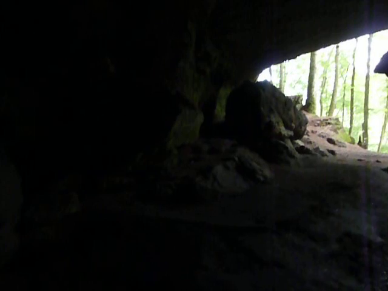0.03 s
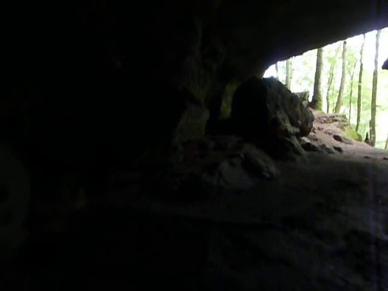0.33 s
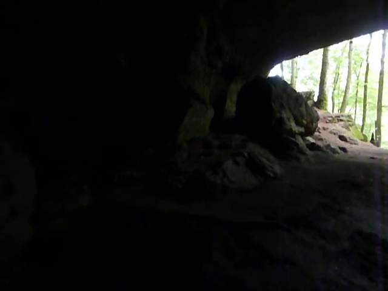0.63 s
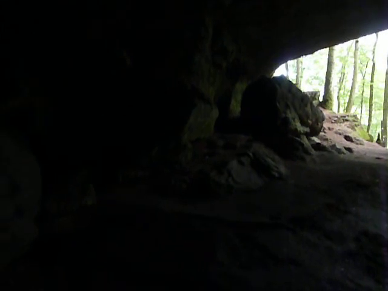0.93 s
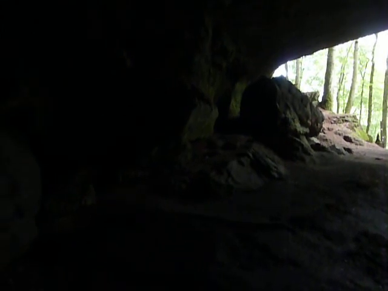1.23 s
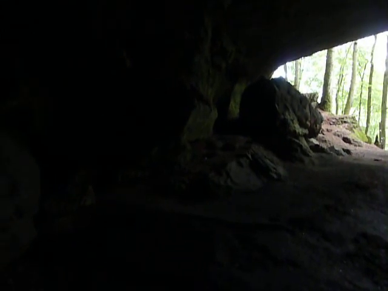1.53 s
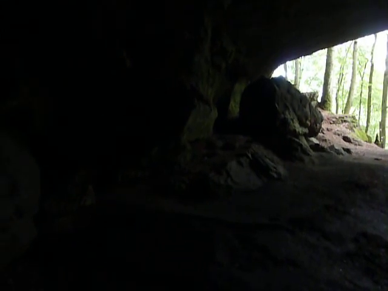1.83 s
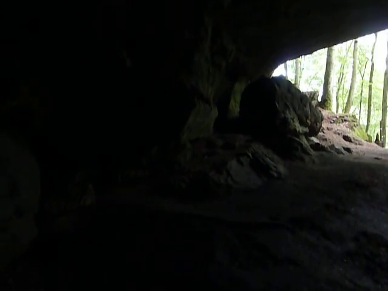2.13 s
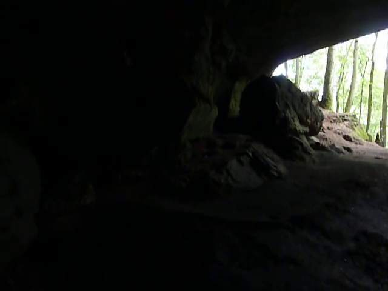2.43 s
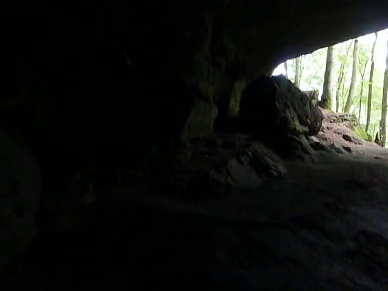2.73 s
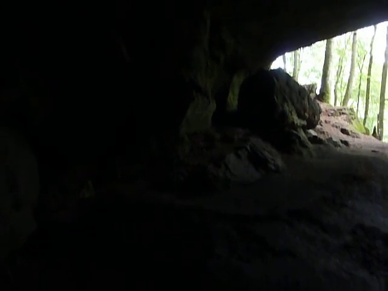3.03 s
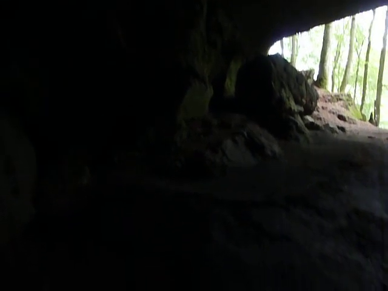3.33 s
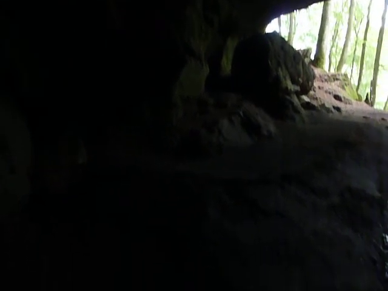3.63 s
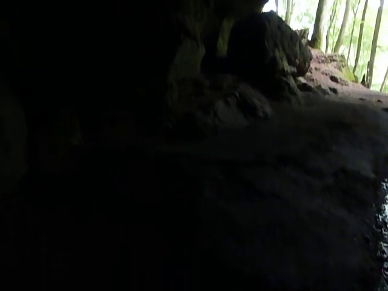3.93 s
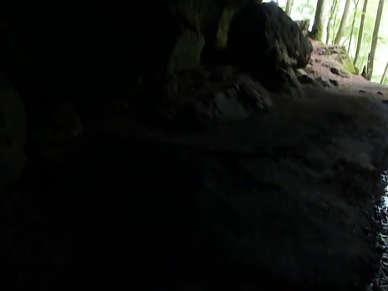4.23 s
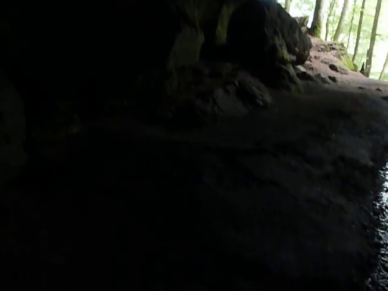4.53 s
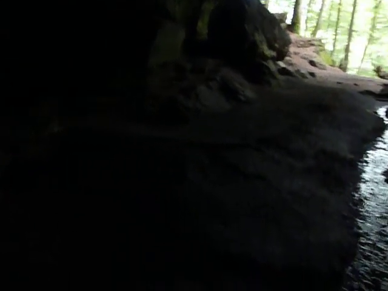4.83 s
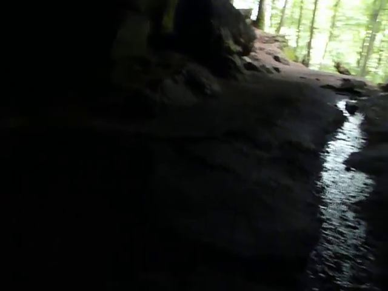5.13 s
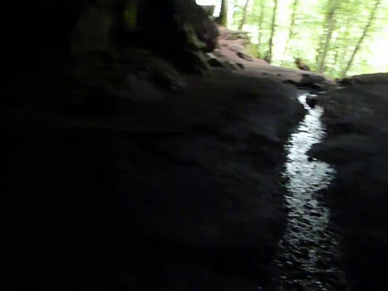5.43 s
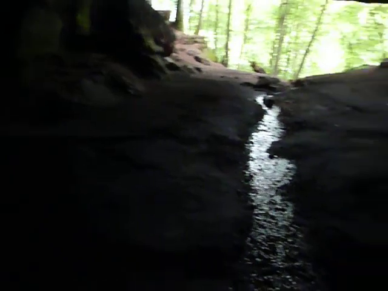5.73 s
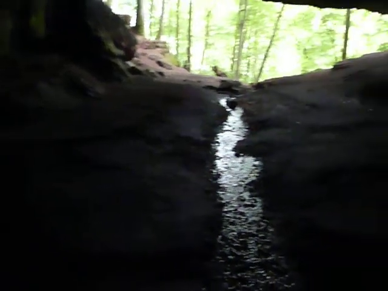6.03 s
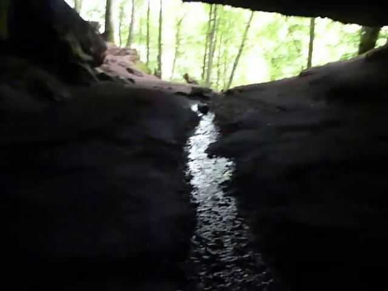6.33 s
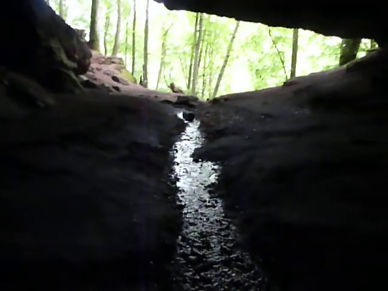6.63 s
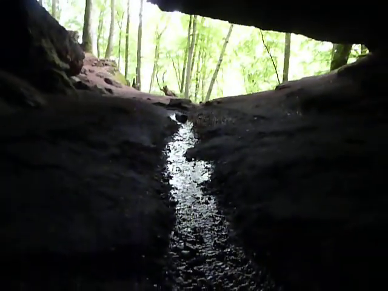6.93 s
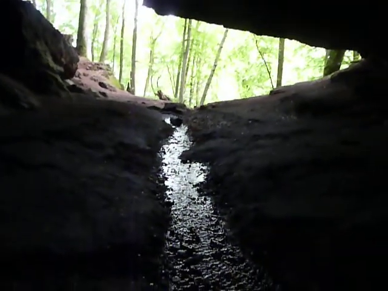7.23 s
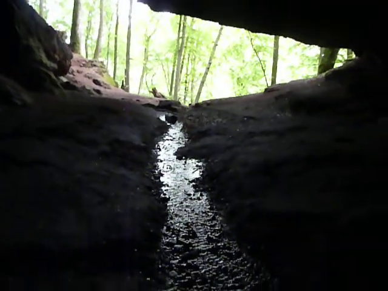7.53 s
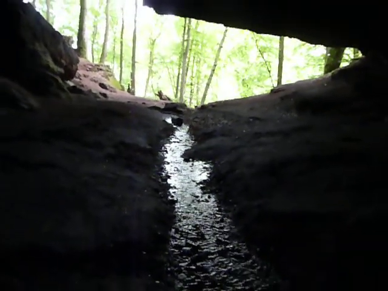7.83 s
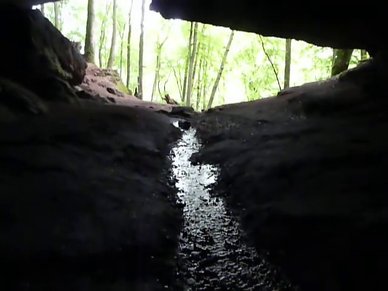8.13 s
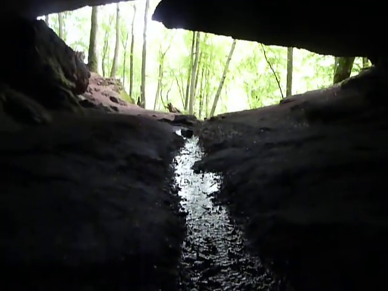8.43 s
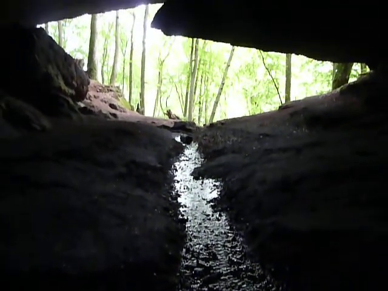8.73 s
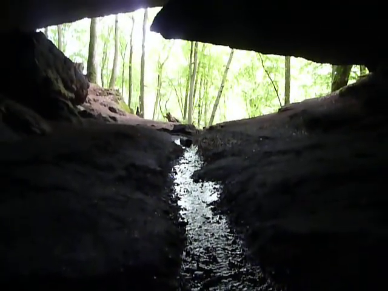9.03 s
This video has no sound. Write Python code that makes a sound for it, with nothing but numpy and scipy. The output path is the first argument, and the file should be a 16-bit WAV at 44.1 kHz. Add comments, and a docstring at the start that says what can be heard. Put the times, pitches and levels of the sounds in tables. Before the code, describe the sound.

Water babbles steadily through a cave while scattered drops tick on rock, two of them snapping loudly close by.

```python
"""In a cave, a small stream runs over rocks, heard through a microphone that loses the highest treble.
Countless small bubbles and fine spray make the rush. Larger bubbles gulp as their trapped air rings,
drips from the roof slap on wet stone, and a few dull thuds sound underneath.
The rock walls smear the sounds with echoes.
Two drops land right by the microphone with loud snaps, and the brighter one overloads it."""
import sys
import numpy as np
from scipy import signal
from scipy.fft import rfft, irfft, next_fast_len
from scipy.io import wavfile
from scipy.ndimage import uniform_filter1d

SR = 44100
rng = np.random.default_rng(int(sys.argv[2]) if len(sys.argv) > 2 else 0)


def inscribe(sig):
    """Save sig as 16-bit PCM at rate SR to the path in sys.argv[1].

    A 1-D sig is mono; a 2-D sig holds one channel per row.
    Samples are clipped to [-1, 1] before scaling.
    """
    pcm = np.round(np.clip(np.atleast_2d(sig).T, -1, 1) * 32767)
    wavfile.write(sys.argv[1], SR, pcm.astype(np.int16))


N = 408807  # length in samples, about 9.3 s

# how strong the rush is from bass to treble: (frequency [Hz], relative level [dB])
RUSH_TONE = [(15, -61.5), (25, -39.5), (82, -7), (220, -4), (310, -6.5), (430, -6), (780, -5), (1100, -3),
             (1700, -1.5), (2600, -0.5), (4800, -4), (7000, -5.5)]
# hollow notes at which the cave rings: (pitch [Hz], width [Hz], boost [dB])
CAVE_NOTES = [(92.2, 18, 6.5), (200, 22, -0.5), (298, 45, 5.5), (808, 99, 4)]
def rush(level_db=-35.5, patch_db=2.0, swell_db=1.4, churn_hz=700):
    """Distant water blends into a steady wash whose bright part churns in shifting patches."""
    frames, hz = N // 512 + 5, np.fft.rfftfreq(2048, 1 / SR)
    real, imag, patches = rng.standard_normal((3, frames, len(hz)))  # noise over time and frequency
    patches = uniform_filter1d(patches, size=7, axis=0)
    patches = unit_level(uniform_filter1d(patches, size=60, axis=1))
    swell = unit_level(uniform_filter1d(rng.standard_normal(frames), size=20))[:, None]
    hollow = sum(db / (1 + (2 * (hz - pitch) / width) ** 2) for pitch, width, db in CAVE_NOTES)
    churn = hz / (hz + churn_hz) * (patch_db * patches + swell_db * swell)
    spectrum = (real + 1j * imag) * gain_of(look_up(RUSH_TONE, hz) + hollow + churn)
    wash = signal.istft(spectrum.T, nperseg=2048, noverlap=1536)[1][:N]
    return gain_of(level_db) * unit_level(wash)


# how loud the faintest small bubbles are at each pitch: (pitch [Hz], level [dB])
SMALL_BUBBLES = [(300, -70), (550, -58), (800, -51), (1400, -50), (2600, -41), (4000, -42), (6500, -43.5)]
def babble(per_s=190, spread_db=3.0, cycles=4.46, rise=0.055, wet_db=3):
    """Small bubbles of many sizes ring at eight shallow spots, each with its own echoes."""
    spots = np.zeros((8, N))
    draws = rng.random((6000, 4))[:int(per_s * N / SR)]
    for k, (when, size, force, life) in enumerate(draws):
        hz = 300 + 6200 * size ** 1.6
        db = look_up(SMALL_BUBBLES, hz) + spread_db * min(-np.log(force), 3)  # a few stand out
        ring = gain_of(db) * bubble(hz, cycles * (.5 + life), rise)
        add(spots[k % len(spots)], when * N / SR, ring)
    return sum(spot + gain_of(wet_db) * cave_echo(spot)[:N] for spot in spots)


# the loudest gulps, each a big bubble with a froth of smaller ones:
# (time [s], relative level [dB], pitch [Hz], froth level against the big bubble [dB])
LOUD_GULPS = [ (.562, -34.5, 915, -6), (1.310, -35.5, 1320, 1), (1.713, -29, 2160, -12),
              (1.926, -24.5, 6580, -13), (2.105, -36.5, 1250, 0.5), (2.225, -31.5, 1375, -7),
              (2.323, -31, 762, -2), (2.454, -33, 1330, -5), (2.746, -30, 810, -0.5),
              (3.110, -29, 3950, -7), (3.199, -31.5, 1560, -7), (4.230, -35, 1320, -5),
              (4.430, -26, 4740, -3), (4.472, -37, 618, -0.5), (4.658, -30, 1064, -5),
              (4.920, -35, 687, -15), (5.170, -27.5, 764, -4), (5.217, -37, 401, -11),
              (5.242, -31, 1194, -5), (6.085, -35.5, 693, -7), (6.169, -24.5, 2330, -15),
              (6.515, -39, 517, -4), (6.695, -38, 440, -9), (6.710, -25, 3310, -14),
              (7.026, -29.5, 710, -7.5), (7.570, -31, 1380, -8), (7.773, -28.5, 2840, -4),
              (8.091, -33.5, 1330, -4), (8.298, -29.5, 2110, -3), (8.544, -22.5, 3020, -10.5),
              (9.078, -29.5, 655, -7), (9.160, -32, 687, -8)]
def gulps(level_db=-1):
    """Large bubbles plop where the water folds over stones."""
    out = np.zeros(N)
    for s, db, hz, froth_db in LOUD_GULPS:
        plop = gain_of(db + level_db) * gulp(hz, froth_db)
        add(out, s, plop)
        add(out, s, cave_echo(plop))
    return out


def gulp(hz, froth_db=-7, froth_s=.066, count=7):
    """One large bubble plops and sheds a string of others, some near its pitch and some well above."""
    smallness = (hz / 1000) ** .45
    cycles, rise = 4.8 * smallness, .045 / smallness  # smaller bubbles ring more cycles and climb less
    plop = np.zeros(SR // 4)
    add(plop, 0, bubble(hz, cycles, rise))
    for k, (late, size) in enumerate(rng.random((count, 2))):
        shed_hz = max(hz - 150, hz / 2) + 850 * size ** 1.36
        add(plop, froth_s * (k + late) / count, gain_of(froth_db) * bubble(shed_hz, cycles * 0.53, rise))
    return plop


# drops landing on wet stone: (time [s], strength of the hit [dB], pitch [Hz], distance [m])
ROOF_DRIPS = [ (.851, -17.5, 1760, 3.6), (.948, -18.5, 3020, 2.2), (1.513, -13.5, 2720, 8),
              (1.543, -17.5, 2570, 3), (1.736, -14, 3600, 4.5), (3.001, -13.5, 2880, 6),
              (3.661, -10.5, 2000, 7.9), (4.658, -12, 1690, 5.1), (4.8944, -27, 2620, 0.8),
              (5.031, -17, 3100, 2.8), (5.494, -22, 4700, 1.6), (5.693, -17.5, 2580, 1.7),
              (6.015, -12.5, 1300, 2.6), (6.030, -14, 1950, 5), (6.393, -18.5, 2700, 2.2),
              (6.438, -11, 2340, 3.4), (6.459, -10, 2720, 4.9), (6.5231, -15.5, 2550, 1.9),
              (6.7591, -12, 2325, 0.57), (7.010, -20, 2830, 1.05), (7.2385, -11, 1540, 0.6),
              (7.373, -19.5, 3140, 1.6), (7.9456, -15, 1670, 2.9), (8.217, -15.5, 3000, 4.5),
              (8.307, -15.5, 2330, 2.8), (8.467, -11, 3100, 6.5), (8.636, -13, 4200, 4)]
def drips(bright_hz=2260, echo_distance_m=1.5, spatter_db=-5, rebound_s=0.001224,
          crack_db=-15, thump_db=-15):
    """Drops fall from the roof: far ones are mostly spatter and echo, near ones a dry snap."""
    out = np.zeros(N)
    for s, db, hz, distance_m in ROOF_DRIPS:
        # higher-pitched drips carry a stronger low thump; lower ones are duller and last fewer cycles
        brightness = np.clip((hz / bright_hz) ** 1.8, .5, 1)
        cycles = 0.91 * brightness
        crack = gain_of(crack_db) * slap(2.3 * hz, 2 * cycles)
        hit = gain_of(db) * (slap(hz, cycles) + crack)
        thump = gain_of(db + thump_db) * brightness ** 2 * slap(hz=496, cycles=.23)
        nearness = echo_distance_m / distance_m  # 1 where the hit is as strong as its echo
        add(out, s, nearness * (hit + thump))
        # droplets thrown up by the hit land all around just after it, so distance weakens them less
        droplets = signal.fftconvolve(hit, spatter(length_s=0.002))
        add(out, s + rebound_s, nearness ** 0.14 * gain_of(spatter_db) * droplets)
        add(out, s, cave_echo(hit))
    return out


def spray(per_s=130, level_db=-39, spread_db=3.0, wet_db=1):
    """Fine droplets patter back onto water and rock."""
    pitches = np.geomspace(1600, 6000, num=8)
    out = np.zeros(N)
    for hz in pitches:
        landings = rng.random(N) < per_s / len(pitches) / SR
        strength = gain_of(level_db + spread_db * np.minimum(rng.exponential(1, N), 3.5))
        out += signal.oaconvolve(landings * strength, slap(hz, cycles=0.64))[:N]
    return out + gain_of(wet_db) * cave_echo(out)[:N]


def splashes(per_s=22, level_db=-35, spread_db=-5.7, length_s=0.012, wet_db=2):
    """Little waves break on stones, each in a short hiss."""
    out = np.zeros(N)
    for k, (late, size, force) in enumerate(rng.random((400, 3))[:int(per_s * N / SR)]):
        burst = signal.fftconvolve(slap(hz=1500 + 3500 * size, cycles=0.57), spatter(length_s))
        db = level_db + spread_db * min(-np.log(force), 3)
        add(out, (k + 2 * late - 1) / per_s, gain_of(db) * burst)
    return out + gain_of(wet_db) * cave_echo(out)[:N]


def gurgle(per_s=3.5, level_db=-39.5, db_per_octave=4, low_hz=850, high_hz=1700, wet_db=1):
    """Fainter gulps keep coming at a loose pace; the deep ones are the softest."""
    out = np.zeros(N)
    for k, (late, size) in enumerate(rng.random((100, 2))[:int(per_s * N / SR)]):
        hz = low_hz * (high_hz / low_hz) ** size
        db = level_db + db_per_octave * np.log2(hz / 1000)
        add(out, (k + late) / per_s, gain_of(db) * gulp(hz))
    return out + gain_of(wet_db) * cave_echo(out)[:N]


# soft, low bumps: (time [s], relative level [dB])
LOW_THUDS = [(2.78, -45.5), (5.58, -46), (6.609, -38.5), (7.871, -45), (7.908, -41), (8.28, -43)]
def thuds(hz=186, level_db=-1, wet_db=-2):
    """Dull bumps boom briefly under the rush."""
    out = np.zeros(N)
    for s, db in LOW_THUDS:
        add(out, s, gain_of(db + level_db) * bubble(hz, cycles=1.5, rise=0))
    return out + gain_of(wet_db) * cave_echo(out)[:N]


# how long the cave's echo lasts: (frequency [Hz], time to fade by 60 dB [s])
ECHO_TIMES = [(150, 0.71), (800, 0.36), (2500, 0.56), (7000, 0.51)]
def cave_echo(sound, early_db=-6, gap_s=.003, early_s=.06):
    """Near walls give a few separate echoes; the rest blur into a fading tail."""
    t = np.arange(SR // 2) / SR
    noise = rng.standard_normal(len(t)) * (t > gap_s)
    hz, frame_s, spectrum = signal.stft(noise, SR, nperseg=256)
    fade = gain_of(-60 * frame_s / look_up(ECHO_TIMES, hz)[:, None])
    tail = signal.istft(spectrum * fade, SR, nperseg=256)[1][:len(t)]
    walls = np.zeros(len(t))
    for place, strength in rng.random((12, 2)):
        add(walls, gap_s + early_s * place, np.array([2 * strength - 1]))
    echo = tail / np.linalg.norm(tail) + gain_of(early_db) * walls / np.linalg.norm(walls)
    return signal.oaconvolve(sound, echo / np.linalg.norm(echo))


def bubble(hz, cycles, rise, onset=0.41):
    """A trapped pocket of air rings, and its pitch climbs as it nears the surface."""
    # each time `cycles` cycles go by, age grows by 1 and the pitch climbs by the fraction `rise`
    age = np.arange(int(6 * cycles / hz * SR)) * hz / (cycles * SR)
    swing = (1 - np.exp(-age / onset)) * np.exp(-age)
    return swing / swing.max() * np.sin(2 * np.pi * cycles * (age + rise * age ** 2 / 2))


def slap(hz, cycles):
    """A landing drop gives the air a quick push that swells for `cycles` cycles and dies away."""
    turns = np.arange(1024) * hz / SR
    age = turns / cycles
    return -(age * np.exp(1 - age)) ** 2 * np.sin(2 * np.pi * turns)


def spatter(length_s):
    """Many tiny hits blur into a fading burst of noise."""
    t = np.arange(int(4 * length_s * SR)) / SR
    burst = rng.standard_normal(len(t)) * np.exp(-t / length_s)
    return burst / np.linalg.norm(burst)


def gain_of(db):
    """Turns decibels into a number to multiply by."""
    return 10 ** (np.asarray(db) / 20)


def unit_level(x):
    """Scales a signal so its average power is 1."""
    return x / np.sqrt(np.mean(x ** 2) + 1e-20)


def look_up(table, hz):
    """Reads between the rows of a table, with octaves evenly spaced."""
    row_hz, value = np.transpose(table)
    return np.interp(np.log(hz + 1), np.log(row_hz + 1), value)


def add(mix, s, sound):
    """Mixes a sound in, starting at s seconds."""
    part = mix[max(round(s * SR), 0):][:len(sound)]
    part += sound[:len(part)]


def scene():
    """All the water, heard at one point."""
    return (rush() + babble() + spray() + splashes() + gurgle() + gulps() + drips() + thuds())[None]


# how well the microphone picks up the treble: (frequency [Hz], gain [dB])
MIC_TREBLE = [(4800, 1.5), (6000, -2), (6800, -9), (7400, -20.5), (7900, -49.5), (8800, -40), (9400, -76.5)]
def record(dry, overload_level=.71, top_hz=16200):
    """The microphone loses the high treble and clips the loudest snap; sound above top_hz is then cut."""
    size = next_fast_len(N + SR)
    response = gain_of(look_up(MIC_TREBLE, np.fft.rfftfreq(size, 1 / SR)))
    dulled = irfft(rfft(dry, size) * response, size)[:, :N]
    clipped = np.clip(dulled, -overload_level, overload_level)
    low_pass = signal.firwin(511, top_hz, window=("kaiser", 9), fs=SR)
    return signal.oaconvolve(clipped, low_pass[None], "same")


dry = scene()
out = record(dry)
inscribe(out)
```